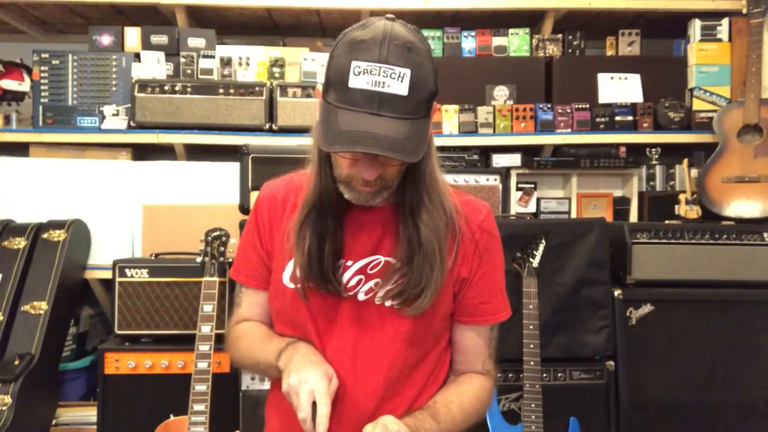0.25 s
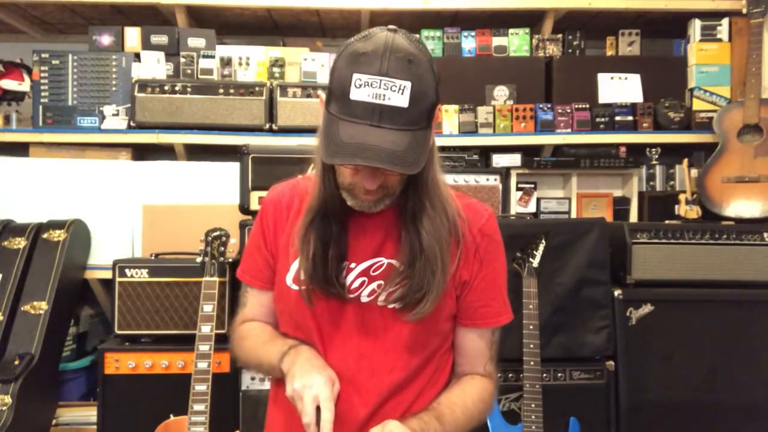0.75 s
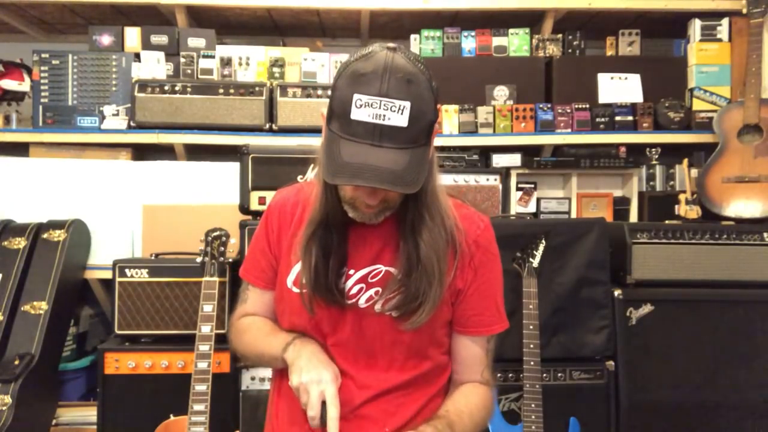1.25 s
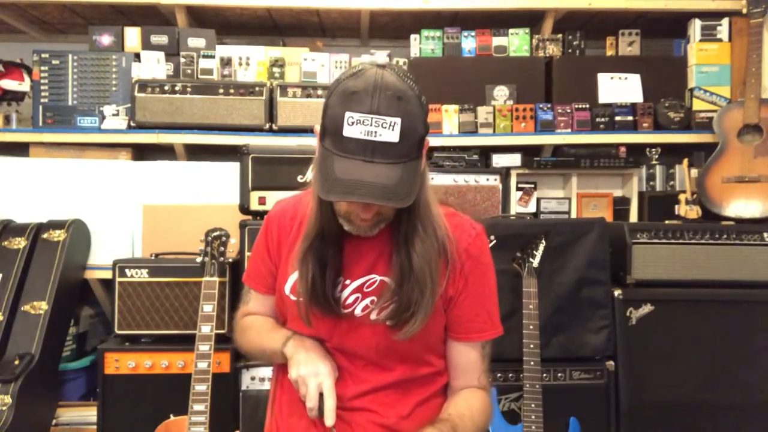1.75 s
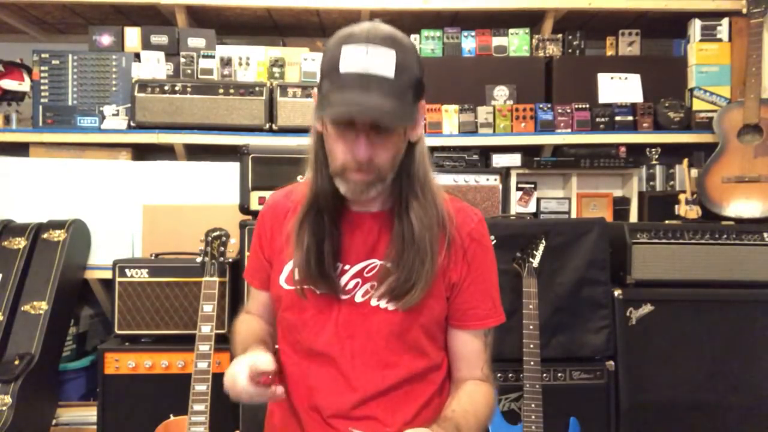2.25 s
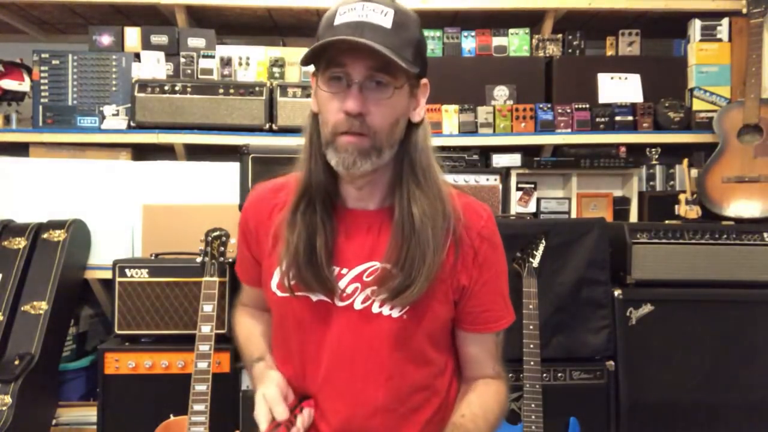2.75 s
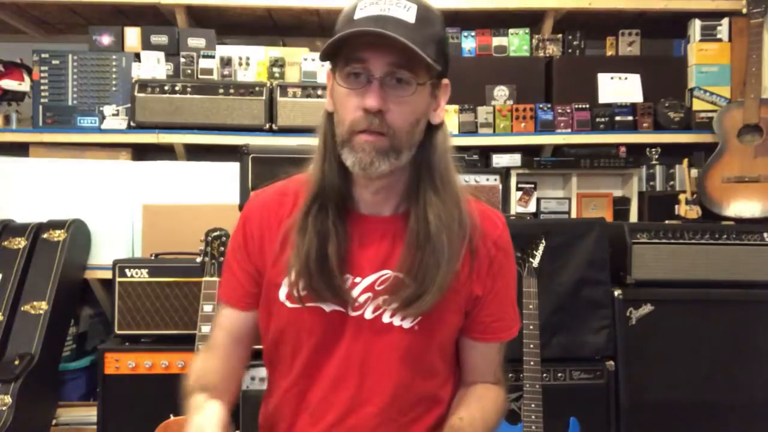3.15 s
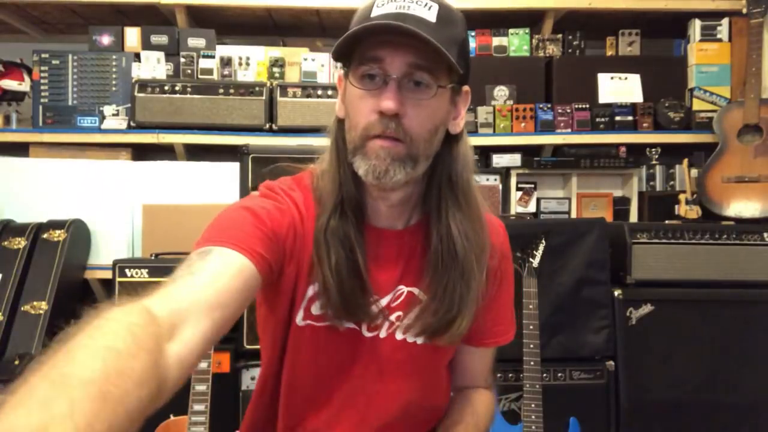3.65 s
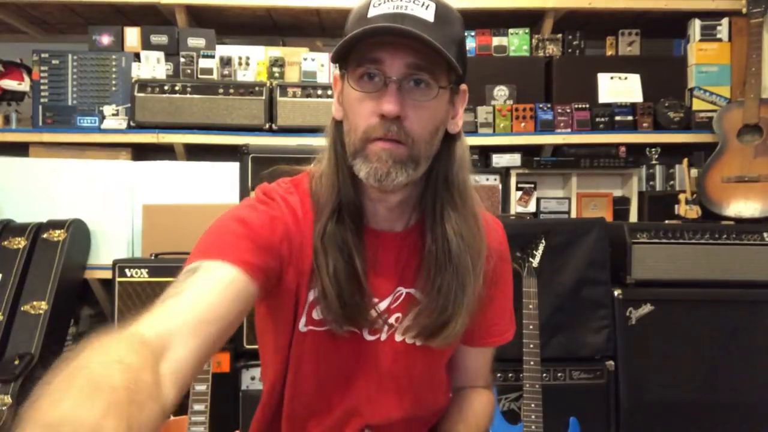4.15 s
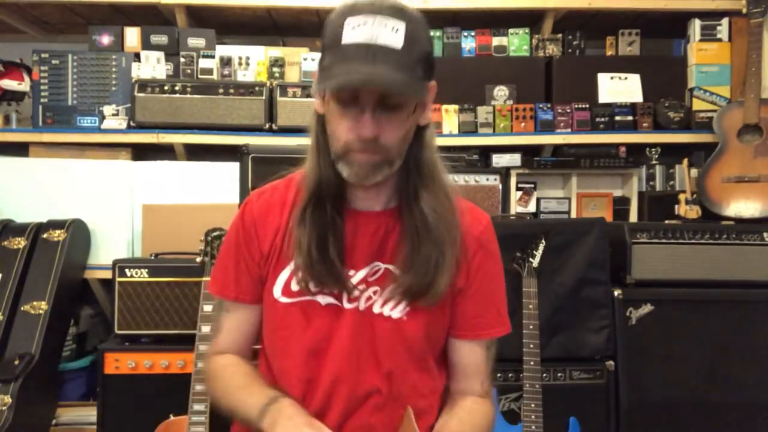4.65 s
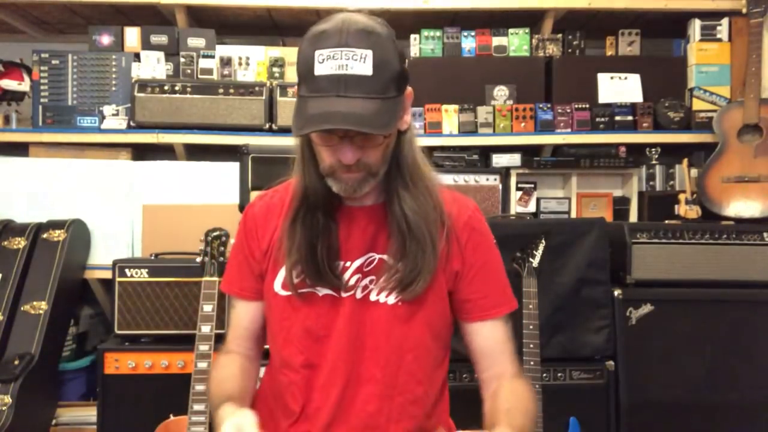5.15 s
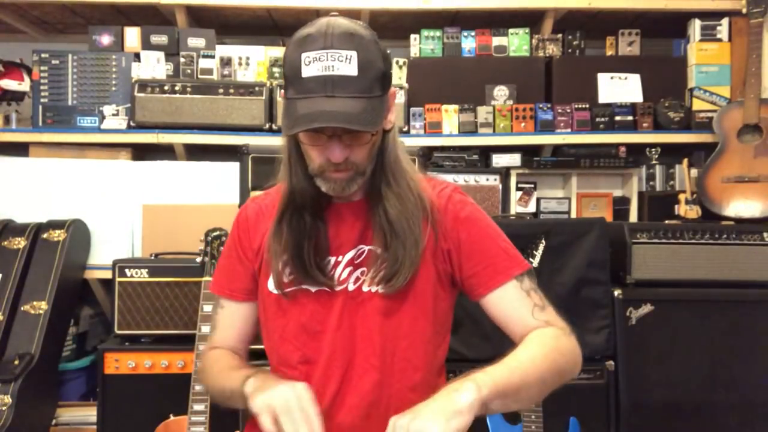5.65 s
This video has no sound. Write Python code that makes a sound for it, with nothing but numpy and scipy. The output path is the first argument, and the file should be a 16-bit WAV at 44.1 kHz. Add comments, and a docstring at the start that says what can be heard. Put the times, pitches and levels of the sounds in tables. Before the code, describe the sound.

A snap-off knife saws through tape on a cardboard box in short, rasping jerks, with papery snaps and hollow bumps. The blade is pulled back with a quick run of ringing clicks. The knife then clacks down loudly on a table close to the microphone, and hands softly rub and tap the box. A faint low engine hum sits behind it all in a small room.

```python
"""Slitting a taped parcel

In a small, crowded room a snap-off knife saws through tape in stick-slip jerks that shake the box.
The blade is ratcheted back, its steel ringing at each notch, and the knife clacks down hard on the
table near the microphone. Hands rub and tap the cardboard, feeling for the flaps.
An engine hums faintly through the wall."""
import sys
import numpy as np
from scipy import signal
from scipy.fft import rfft, irfft
from scipy.io import wavfile

SR = 44100
rng = np.random.default_rng(int(sys.argv[2]) if len(sys.argv) > 2 else 0)


def dump(signal):
    """Clip the signal to [-1, 1] and save it as 16-bit WAV at the path in sys.argv[1]."""
    limited = np.clip(np.atleast_2d(signal).T, -1, 1)
    pcm = np.round(limited * 32767).astype(np.int16)
    wavfile.write(sys.argv[1], SR, pcm)


N = 261069
TIME = np.arange(N) / SR

# cardboard panel modes: f/Hz, level/dB, t60/s
BOX_MODES = [(178.5, -6, 0.15), (249.5, -1.5, 0.15), (292.2, 0, 0.18), (337, 1, 0.036), (395.6, 2.5, 0.065),
             (453, 1.5, 0.051), (690, -2, 0.016), (1244, -13, 0.069)]
# slider jumping the notches: t/s, click/dB, ring/Hz
NOTCHES = [(2.6548, 3, 3680), (2.6898, 0.5, 3450), (2.722, 1.5, 3770), (2.7532, 1.5, 6440),
           (2.7929, 3, 5260), (2.832, 1, 7440), (2.8625, -2.5, 3900), (2.8912, 2.5, 4870),
           (2.9260, 1, 5100)]


def cutting():
    """The blade jerks through tape and fibres: the edge rasps, the cut scrapes, the box growls."""
    # short hard pushes, long light drags: t/s, length/s, growl/dB, scrape/dB, rasp/dB
    cuts = [(0.147, 0.028, -44, -55.5, -49.5), (0.365, 0.057, -58, -61, -60.5),
            (0.505, 0.052, -52.5, -52, -53), (0.614, 0.037, -39, -44.5, -43),
            (0.805, 0.034, -57, -58.5, -59.5), (0.855, 0.11, -49, -54.5, -51),
            (0.94, 0.047, -38.5, -42, -45), (1.075, 0.13, -43, -46.5, -53.5), (1.2, 0.47, -52, -58, -60),
            (1.453, 0.015, -41, -40, -43), (1.49, 0.04, -46.5, -53, -54.5),
            (1.625, 0.04, -44, -46.5, -46.5), (1.70, 0.048, -58.5, -57.5, -58.5),
            (1.795, 0.037, -46, -43.5, -44.5), (1.836, 0.053, -37.5, -51, -47)]
    # spectra: f/Hz, level/dB
    growl_spectrum = [(100, -21), (170, -4.5), (215, -10), (250, 2), (300, -1), (360, -2), (430, -4.5),
                      (500, 1.5), (600, -1.5), (720, -3), (850, -27), (1300, -18.5), (3000, -67)]
    rasp_spectrum = [(900, -14), (1500, 2.5), (2100, -1.5), (3200, -2), (5000, -7.5), (6800, -7),
                     (9200, -13.5), (11700, -17), (15000, -22), (16000, -26)]
    # resonances of the scraping edge: f/Hz, width/Hz, level/dB
    scrape_peaks = [(902, 48, 2), (1090, 235, 6), (1210, 160, -27)]
    rasp_peaks = [(2520, 490, -4.5), (3020, 150, -3), (3840, 130, -5.5), (4950, 200, 1.5)]
    growl_gain, scrape_gain, rasp_gain = stroke_gains(cuts, attack_s=0.042, swell_db=-0.5, release_s=0.025)
    slips = friction(slips_per_s=900, spread_db=2, smooth_db=0, uneven_db=5.5, jerks_per_s=90)
    growl = box_panels(slips, growl_spectrum, ring_db=4.5, width_hz=11.4)
    scrape = rms_one(resonate(resonances(slips, scrape_peaks), hz=1100, width_hz=2220))
    rasp = rms_one(colour(slips + resonances(slips, rasp_peaks), rasp_spectrum))
    return growl_gain * growl + scrape_gain * scrape + rasp_gain * rasp


def taps():
    """The blade catches or a finger taps: a papery snap and the hollow boom of the box."""
    hits = [(0.112, -8.5, 1840, -42.5), (0.611, -15, 2650, -40), (0.623, -21, 1100, -36),
            (0.848, -26, 3080, -52.5), (1.070, -30, 700, -44.5), (1.448, -18.5, 1090, -44.5),
            (1.586, -18, 750, -40), (1.633, -6, 650, -52), (1.658, -19.5, 4670, -46.5),
            (1.827, -2, 1040, -46), (1.882, -15, 650, -40.5), (1.8942, -3.5, 2700, -56),
            (4.446, -32, 500, -58), (4.621, -20, 1020, -47), (4.646, -33, 403, -53),
            (4.777, -24, 500, -47.5), (4.803, -47, 500, -60), (4.856, -33, 1600, -47),
            (4.895, -42, 500, -52), (5.317, -23.5, 680, -59), (5.388, -32, 394, -58)]  # t/s, snap/dB, ring/Hz, boom/dB
    spectrum = [(200, -5), (500, 11.5), (1200, 6.5), (2200, -2.5), (5000, 5), (9000, 2.5), (16000, -3)]  # snap: f/Hz, level/dB
    times_s, _, _, boom_db = np.transpose(hits)
    out = struck(BOX_MODES, times_s, boom_db, scatter_db=2.5)
    for start_s, db, hz, _ in hits:
        snap = contact(spectrum, rise_s=0.0005, decay_s=0.003, ring_hz=hz, ring_db=2, width_ratio=0.5)
        add(out, start_s, from_db(db) * soften(snap, 2.7 * hz))
    return out


def ratchet():
    """The sprung slider snaps into each notch; the table top returns an echo."""
    spectrum = [(100, -17), (250, -20.5), (500, -22.5), (950, -23.5), (1300, -11.5), (2000, -6),
                (2700, -8.5), (3800, -1), (5100, -2.5), (6500, -1), (7900, -0.5), (9000, -5), (11500, -2),
                (15500, -12.5)]  # click: f/Hz, level/dB
    out = np.zeros(N)
    for start_s, db, hz in NOTCHES:
        click = contact(spectrum, rise_s=0.0014, decay_s=0.0012, ring_hz=hz, ring_db=0, width_ratio=0.25)
        add(out, start_s, from_db(db) * click)
    echo = np.interp(TIME - 0.0073, TIME, out)
    return out + from_db(-16.5) * echo


def blade_ring():
    """The steel rings and buzzes in its channel more freely with each notch, most as it slides home."""
    times_s = np.transpose(NOTCHES)[0]
    steel_db = -51.5 + 1.4 * np.arange(len(times_s))
    steel_db[-1] += 2.5  # hard stop
    shake = sum(from_db(db) * (TIME > start_s) * np.exp(-np.abs(TIME - start_s) / 0.032)
                for start_s, db in zip(times_s, steel_db))
    buzz = from_db(1) * rms_one(noise_band(2250, 3150, order=4, size=N))
    modes = [(2560, -0.5, 0.16), (2700, -7.5, .22), (2950, -2, 0.2), (3030, -10, 0.18), (3677, -8.5, 0.15),
             (4960, -11, 0.15), (7660, -8, .18), (9300, -5.5, 0.42), (13390, -7.5, .19),
             (13850, -12, 0.165)]  # steel: f/Hz, level/dB, t60/s
    return struck(modes, times_s, steel_db, scatter_db=3.5) + shake * buzz


def slider():
    """The thumb pushes the slider home, scraping it along its track."""
    push = [(2.64, 0.31, -56.5)]  # t/s, length/s, level/dB
    spectrum = [(120, -16.5), (250, 12.5), (450, -9), (900, 0.5), (2500, -1), (4200, -3), (8000, -8),
                (16000, -13)]  # scrape: f/Hz, level/dB
    gain, = stroke_gains(push, attack_s=0.22, swell_db=7.5, release_s=0.011)
    slips = friction(slips_per_s=3700, spread_db=2, smooth_db=2, uneven_db=6.5, jerks_per_s=60)
    return gain * colour(slips, spectrum)


def knife_drop():
    """Each end of the knife clacks down in turn; the handle rings and the table thumps."""
    knocks = [(3.853, -13.5, 1700, -35), (3.860, -10.5, 4500, -42), (3.866, -6.5, 4000, -58),
              (3.87, -7.5, 3000, -68), (3.939, -19, 1500, -41.5), (3.950, -26, 5000, -51),
              (4.007, 9.5, 1900, -30), (4.017, 4.5, 1500, -60), (4.0226, 4.5, 3200, -25),
              (4.028, -5, 3000, -51), (4.0415, -23, 3500, -34), (4.063, 8, 1550, -34),
              (4.0723, -13, 7000, -50), (4.087, -6, 1600, -41)]  # touch, fall, rocking: t/s, clack/dB, ring/Hz, thump/dB
    spectrum = [(100, -9.5), (220, -11), (330, 0), (480, -3), (850, 1), (1080, -6), (1400, 3), (1950, -3),
                (2500, 2), (3200, -4.5), (4300, -2), (8000, -6), (11000, -3.5), (16000, -12.5)]  # clack: f/Hz, level/dB
    # modes: f/Hz, level/dB, t60/s
    table_modes = [(51, -23, 0.32), (73.5, -21.5, 0.38), (115.8, -17, 0.15), (184.4, -14.5, 0.12),
                   (257, -2, 0.095), (307, 1.5, 0.066), (354, -2.5, 0.12), (469, 0, 0.036), (542, 0, 0.04),
                   (800, -22, 0.038)]
    handle_modes = [(1300, 1.5, 0.14), (1430, 7, 0.16), (1590, -10, 0.17), (1606, -5, 0.13),
                    (1930, -7.5, 0.15), (2270, -12.5, .13), (2470, -5, 0.11), (2570, -5, .11)]
    times_s, clack_db, _, thump_db = np.transpose(knocks)
    out = struck(table_modes, times_s, thump_db, scatter_db=4)
    out += struck(handle_modes, times_s, clack_db - 54.5, scatter_db=3.5)
    for start_s, db, hz, _ in knocks:
        clack = contact(spectrum, rise_s=0.0004, decay_s=0.002, ring_hz=hz, ring_db=4, width_ratio=0.6)
        add(out, start_s, from_db(db) * soften(clack, 2.3 * hz))
    return out


def rubbing():
    """A faint, brief squeak near 1 kHz; later, hands and sleeves rub the box and fingertips swish."""
    rubs = [(3.90, 0.083, -62.5, -62.5), (4.25, 0.23, -63.5, -71), (4.56, 0.7, -79, -65.5),
            (4.665, 0.03, -79, -57), (4.785, 0.098, -59, -57.5), (5.06, 0.16, -62, -62),
            (5.44, 0.034, -51.5, -53.5), (5.53, 0.37, -62, -57.5), (5.815, 0.018, -53, -60)]  # t/s, length/s, body/dB, hiss/dB
    # first row the squeak, the rest fingertip swishes: peak t/s, half-width/s, f/Hz, level/dB
    bursts = [(3.376, 0.0066, 1050, -58.5), (4.366, 0.04, 1090, -60), (4.88, 0.038, 1530, -61.5),
              (5.076, 0.077, 1060, -66.5), (5.462, 0.015, 1620, -60), (5.61, 0.009, 590, -70),
              (5.668, 0.031, 1360, -49.5), (5.762, 0.06, 1150, -62.5)]
    # spectra: f/Hz, level/dB
    body_spectrum = [(120, -30.5), (210, -7), (250, -4.5), (330, -5.5), (450, -6), (700, -4.5),
                     (1000, -5.5), (1400, -7), (2400, -13), (5000, -29)]
    hiss_spectrum = [(1100, 0), (1900, -3.5), (2600, -2.5), (3800, -0.5), (4800, -3), (7200, -1),
                     (8800, -6.5), (12000, -8.5), (15500, -17.5)]
    body_gain, hiss_gain = stroke_gains(rubs, attack_s=0.1, swell_db=0.7, release_s=0.026)
    slips = friction(slips_per_s=900, spread_db=2.5, smooth_db=-1, uneven_db=4.5, jerks_per_s=48)
    out = body_gain * box_panels(slips, body_spectrum, ring_db=5.5, width_hz=24)
    out += hiss_gain * colour(slips, hiss_spectrum)
    for peak_s, half_width_s, hz, db in bursts:
        width_hz = 0.27 * hz
        band = rms_one(resonate(resonate(slips, hz, width_hz), hz, width_hz))
        out += from_db(db) * band * np.exp(-((TIME - peak_s) / half_width_s) ** 2)
    return out


def blade_ticks():
    """The loose blade ticks in its handle."""
    ticks = [(2.314, -23.5, 3940), (2.325, -26.5, 4050), (2.425, -25.5, 4300), (2.505, -36.5, 5300),
             (3.074, -29, 2930), (3.597, -31.5, 6930), (3.715, -38, 3000), (3.78, -34.5, 2980)]  # t/s, level/dB, ring/Hz
    spectrum = [(500, -10), (1500, -2.5), (3800, 1), (6000, -5.5), (9000, -9), (16000, -19.5)]  # tick: f/Hz, level/dB
    out = np.zeros(N)
    for start_s, db, hz in ticks:
        tick = contact(spectrum, rise_s=0.00054, decay_s=0.0087, ring_hz=hz, ring_db=4.5, width_ratio=0.41)
        add(out, start_s, from_db(db) * tick)
    return out


def room(x):
    """Dense reflections build up after a short gap and die band by band; power gain 1."""
    decay = [(60, .3), (250, .25), (700, 0.26), (1600, 0.37), (3000, 0.38), (5000, 0.38), (9000, 0.24),
             (16000, 0.28)]  # f/Hz, t60/s
    gap_s, build_s = 0.00057, 0.016
    t, tail = TIME[:SR // 2], 0
    edges_hz = np.geomspace(45, 18000, 11)
    for low, high in zip(edges_hz, edges_hz[1:]):
        t60_s = at_hz(decay, np.sqrt(low * high))
        tail += noise_band(low, high, order=2, size=len(t)) * from_db(-60 * t / t60_s)
    tail *= np.clip((t - gap_s) / build_s, 0, 1)
    return signal.fftconvolve(x, tail / np.linalg.norm(tail))[:N]


def engine():
    """Only low orders pass the wall; each swells as it glides through a standing wave of the room."""
    speeds = [(0, 16.6), (0.2, 17), (0.5, 18.5), (1.7, 23.1), (2.35, 24.6), (2.7, 22), (3.0, 18),
              (3.35, 17.35), (3.75, 17.7), (4.55, 17.2), (5.0, 14.3), (5.9, 14)]  # speeding up, then slowing: t/s, cycle rate/Hz
    orders = [(3, -4.5), (5, -1.5), (6, -19.5), (8, -4.5), (11, -16)]  # multiple of cycle rate, level/dB
    wall = [(50, -14), (72, -23.5), (87, -17), (95, 0), (120, -3.5), (142, 3), (150, -7), (175, -19),
            (187, 2), (196, -2.5), (215, -10.5)]  # wall and standing waves: f/Hz, gain/dB
    fade_start_s, fade_s, fade_db = 3.64, 0.35, -14.5
    level = from_db(-56.5 + fade_db * np.clip((TIME - fade_start_s) / fade_s, 0, 1))
    cycle_hz = np.interp(TIME, *np.transpose(speeds))
    phase = 2 * np.pi * np.cumsum(cycle_hz) / SR
    hum = 0
    for order, db in orders:
        gain = from_db(db + at_hz(wall, order * cycle_hz))
        hum += gain * np.sin(order * phase + 2 * np.pi * rng.random())
    return np.sqrt(2) * level * hum


def air():
    """Still room air: faint, steady, bass-heavy noise."""
    spectrum = [(15, -66), (25, -13.5), (117, 1.5), (285, -7), (394, -6), (545, -11), (840, -14),
                (1070, -13.5), (1370, -18.5), (3820, -22.5), (7310, -24.5), (8590, -30.5), (14800, -33.5),
                (16000, -44)]  # f/Hz, level/dB
    return from_db(-63.5) * colour(rng.standard_normal(N), spectrum)


def friction(slips_per_s, spread_db, smooth_db, uneven_db, jerks_per_s):
    """Surfaces catch and let go at random over a smooth rub, under jerky pressure; rms 1."""
    slipping = rng.random(N) < slips_per_s / SR
    strength = from_db(spread_db * np.minimum(rng.exponential(1, N), 4))
    slips = rms_one(slipping * strength * rng.choice([-1, 1], N))
    jerks = rng.uniform(-1, 1, size=2048)
    pressure = from_db(uneven_db * np.interp(TIME * jerks_per_s, np.arange(len(jerks)), jerks))
    return rms_one(pressure * (slips + from_db(smooth_db) * rng.standard_normal(N)))


def box_panels(slips, spectrum, ring_db, width_hz):
    """Slips drive the cardboard, whose panels stress their own modes; rms 1."""
    panels = sum(from_db(db) * resonate(slips, hz, width_hz) for hz, db, _ in BOX_MODES)
    return rms_one(colour(slips + from_db(ring_db) * panels, spectrum))


def stroke_gains(strokes, attack_s, swell_db, release_s):
    """One gain curve per dB column: each stroke rises, changes by swell_db while held, then dies."""
    gains = 0
    for start_s, length_s, *db in strokes:
        t = TIME - start_s
        rise = np.clip(1 + t / attack_s, 0, 1) ** 2
        hold = from_db(swell_db * (np.clip(t / length_s, 0, 1) - 0.5))
        fall = np.exp(-np.maximum(t - length_s, 0) / release_s)
        gains = np.maximum(gains, np.outer(from_db(db), rise * hold * fall))
    return gains


def contact(spectrum, rise_s, decay_s, ring_hz, ring_db, width_ratio):
    """Hard contact: a brief rattle of micro-impacts with one stressed resonance; energy 1."""
    t = TIME[:2048]
    envelope = np.minimum(t / rise_s, 1) ** 2 * np.exp(-np.maximum(t - rise_s, 0) / decay_s)
    rattle = colour(rng.choice([-1, 1], len(t)) * envelope, spectrum)
    sound = rattle + from_db(ring_db) * resonate(rattle, ring_hz, ring_hz * width_ratio)
    return sound / np.linalg.norm(sound)


def struck(modes, times_s, blow_db, scatter_db):
    """Each blow rings every mode, with random scatter in strength."""
    out, onsets = np.zeros(N), np.round(times_s * SR).astype(int)
    scatter = scatter_db * rng.standard_normal((len(onsets), len(modes)))
    for k, (hz, db, t60_s) in enumerate(modes):
        blows = np.full(N, 1e-18)
        blows[onsets] = from_db(blow_db + db + scatter[:, k]) * (-1) ** k
        r, w = from_db(-60 / (t60_s * SR)), 2 * np.pi * hz / SR
        out += signal.lfilter([0, np.sin(w)], [1, -2 * r * np.cos(w), r * r], blows)
    return out


def soften(x, corner_hz):
    """One-pole low-pass: a softer contact lasts longer and carries less treble."""
    r = np.exp(-2 * np.pi * corner_hz / SR)
    return signal.lfilter([1 - r], [1, -r], x)


def resonate(x, hz, width_hz):
    """One resonance, peak gain 1."""
    r, w = np.exp(-np.pi * width_hz / SR), 2 * np.pi * hz / SR
    return signal.lfilter(np.array([1, 0, -1]) * (1 - r * r) / 2, [1, -2 * r * np.cos(w), r * r], x)


def resonances(x, peaks):
    """Parallel resonances."""
    return sum(from_db(db) * resonate(x, hz, width_hz) for hz, width_hz, db in peaks)


def colour(x, spectrum, size=4096):
    """Minimum-phase filter with the given spectral shape; power gain 1."""
    magnitude = from_db(at_hz(spectrum, np.fft.rfftfreq(size, 1 / SR)))
    cepstrum = irfft(np.log(magnitude))
    response = irfft(np.exp(rfft(2 * cepstrum[:size // 2], size)))
    return signal.fftconvolve(x, response / np.linalg.norm(response))[:len(x)]


def noise_band(low_hz, high_hz, order, size):
    """Band-passed white noise."""
    bandpass = signal.butter(order, [low_hz, high_hz], "band", fs=SR, output="sos")
    return signal.sosfilt(bandpass, rng.standard_normal(size))


def add(track, start_s, sound):
    """Mix a sound in at start_s."""
    start = round(start_s * SR)
    track[start:start + len(sound)] += sound[:N - start]


def at_hz(points, hz):
    """Read a table on a log-frequency axis."""
    f, value = np.transpose(points)
    return np.interp(np.log(np.maximum(hz, 1)), np.log(f), value)


def from_db(db):
    """Decibels to gain."""
    return 10 ** (np.asarray(db) / 20)


def rms_one(x):
    """Scale to rms 1."""
    return x / np.sqrt(np.mean(x ** 2) + 1e-20)


def scene():
    """Box and knife in the room, over engine hum and still air; mono."""
    box = cutting() + rubbing() + taps()
    knife = ratchet() + slider() + blade_ticks()
    steel, drop = blade_ring(), knife_drop()
    send = from_db(-8.5) * box + from_db(-6.5) * knife + from_db(-6) * steel + from_db(-12) * drop
    return (box + knife + steel + drop + room(send) + air() + engine())[None]


def record(dry):
    """The microphone sheds deep bass; the top is cut steeply."""
    low_hz, high_hz = 40, 16000
    thin = signal.sosfilt(signal.butter(4, low_hz, "high", fs=SR, output="sos"), dry)
    return signal.sosfilt(signal.ellip(10, 0.1, 80, high_hz, fs=SR, output="sos"), thin)


dry = scene()
out = record(dry)
dump(out)
```